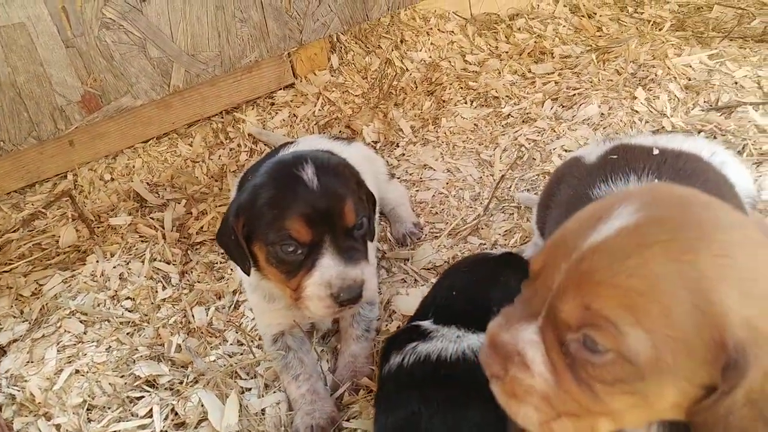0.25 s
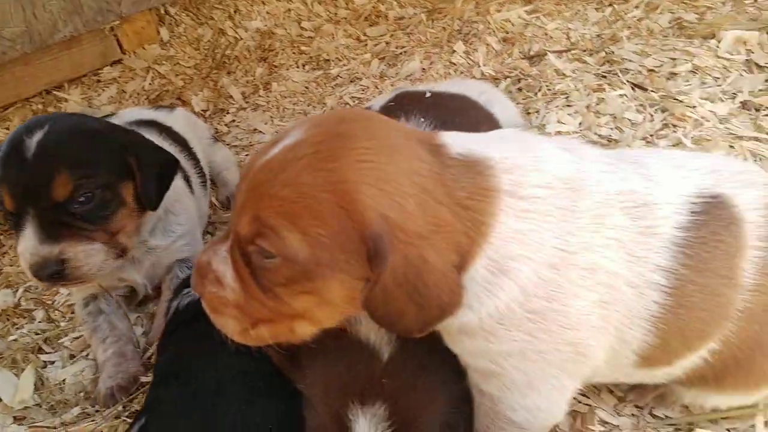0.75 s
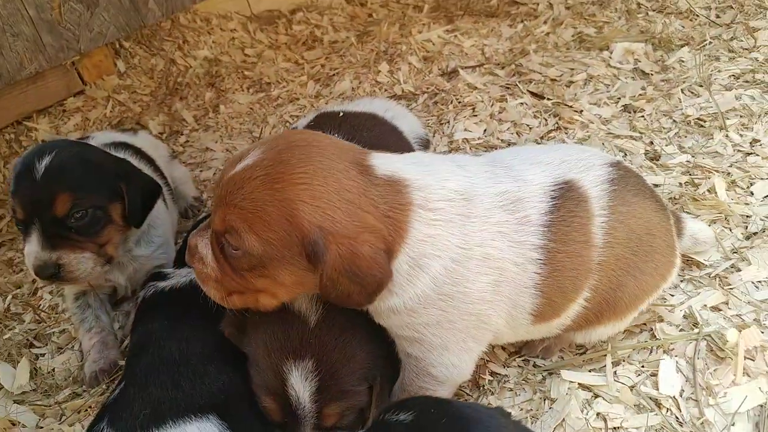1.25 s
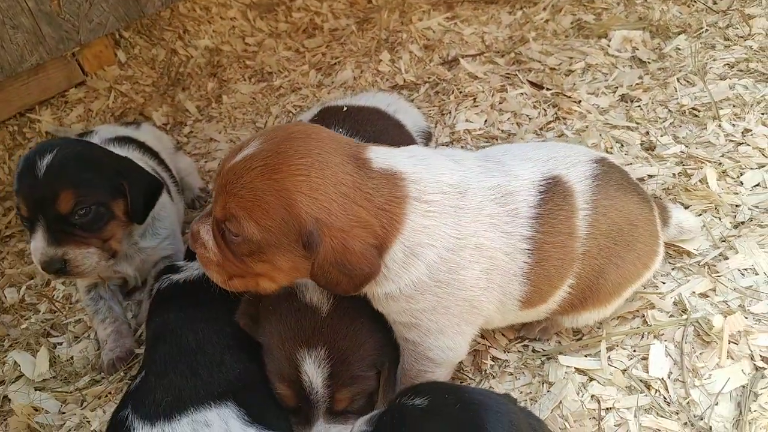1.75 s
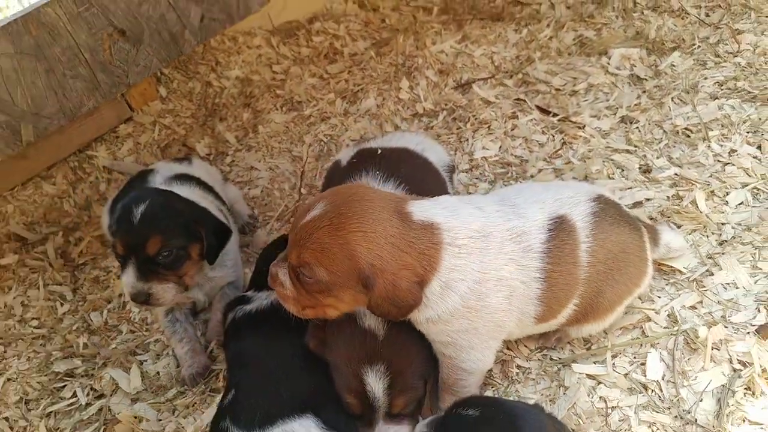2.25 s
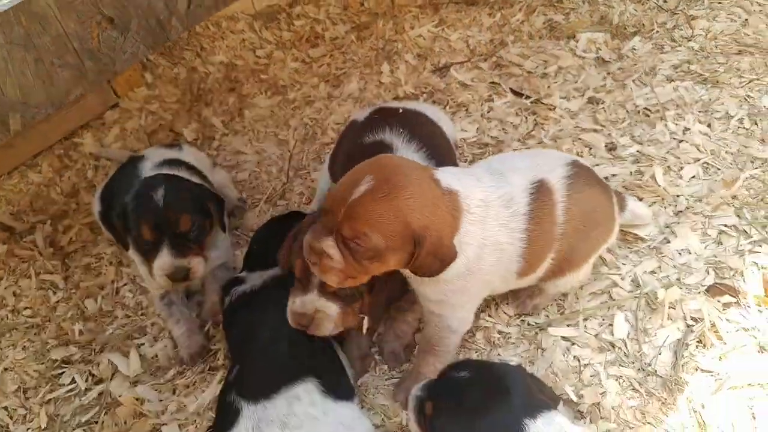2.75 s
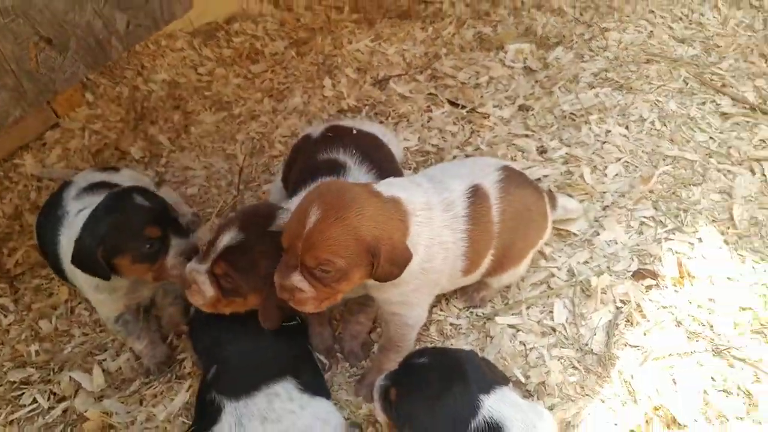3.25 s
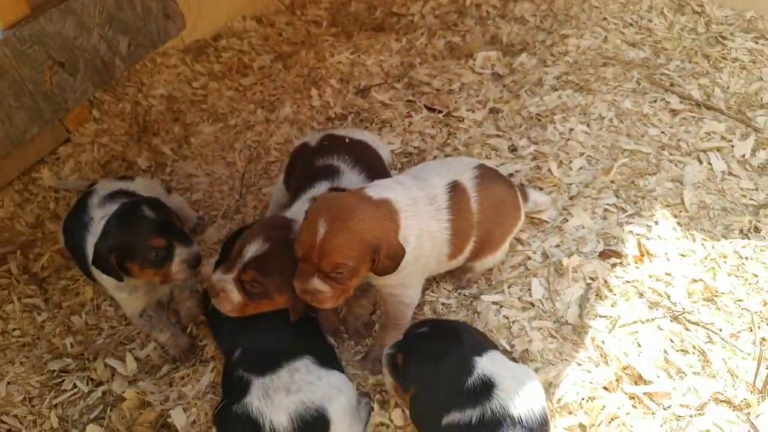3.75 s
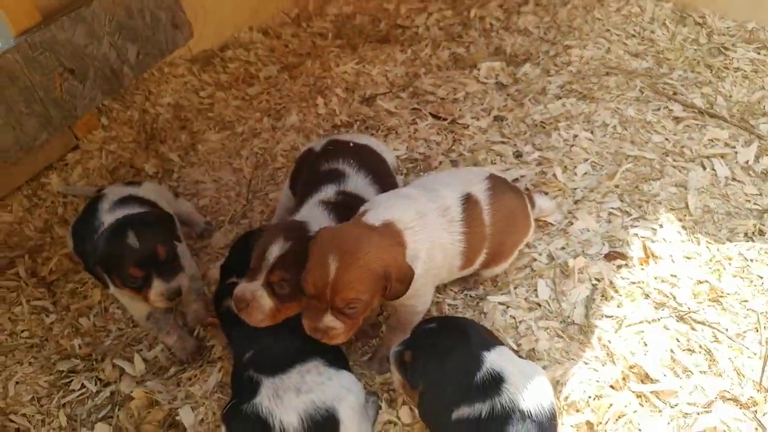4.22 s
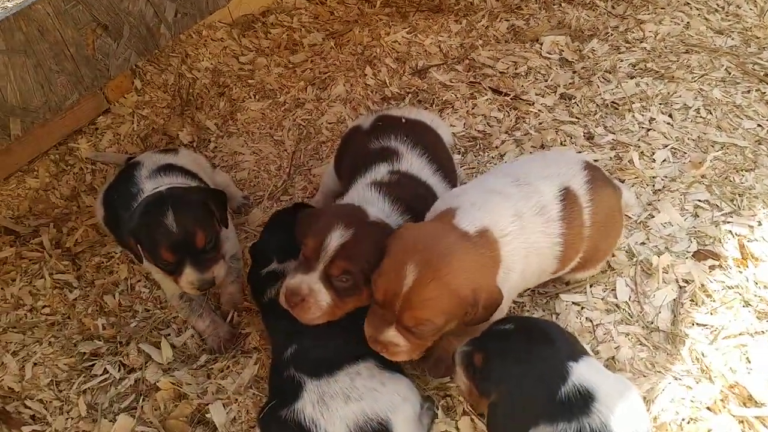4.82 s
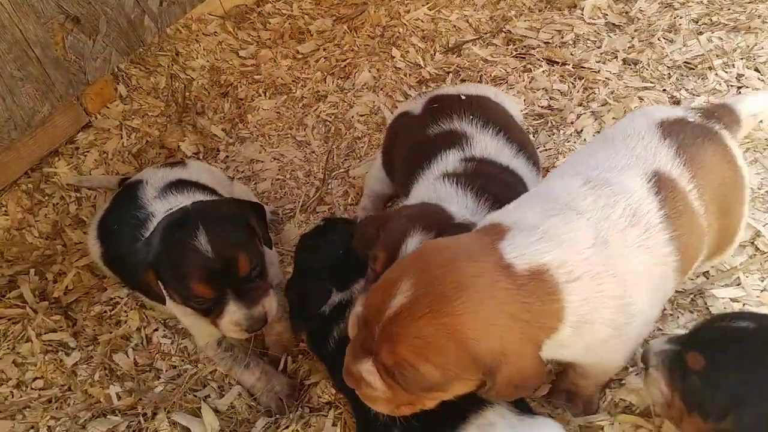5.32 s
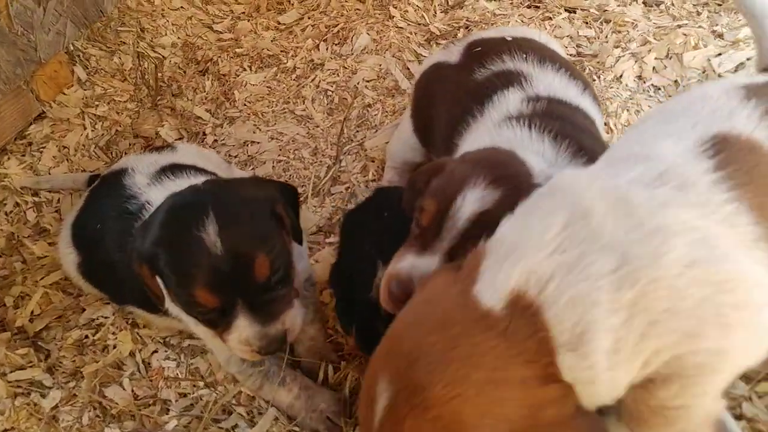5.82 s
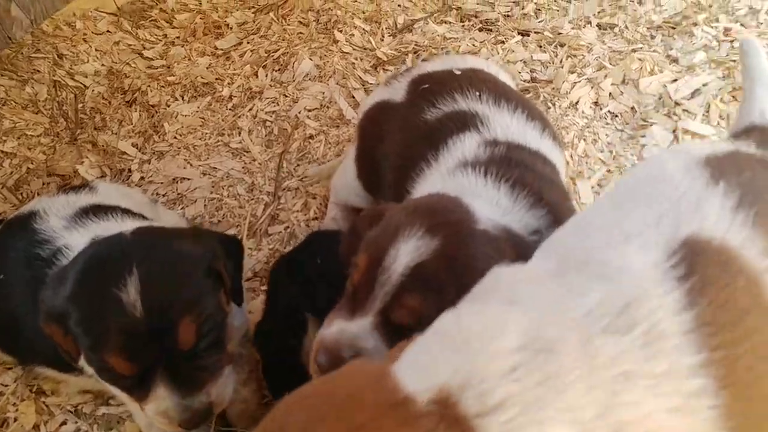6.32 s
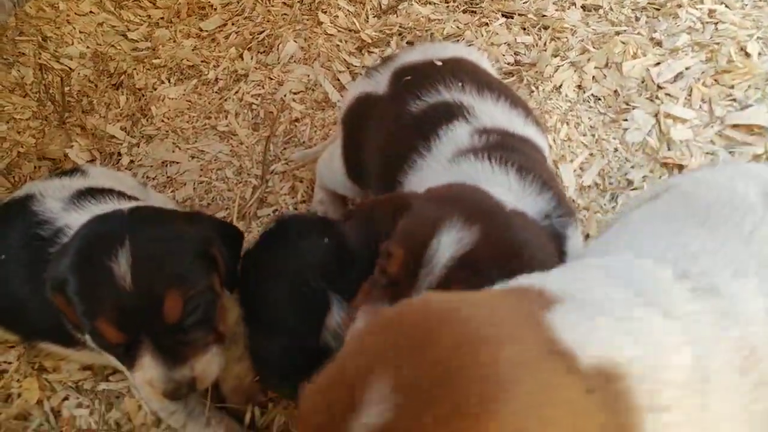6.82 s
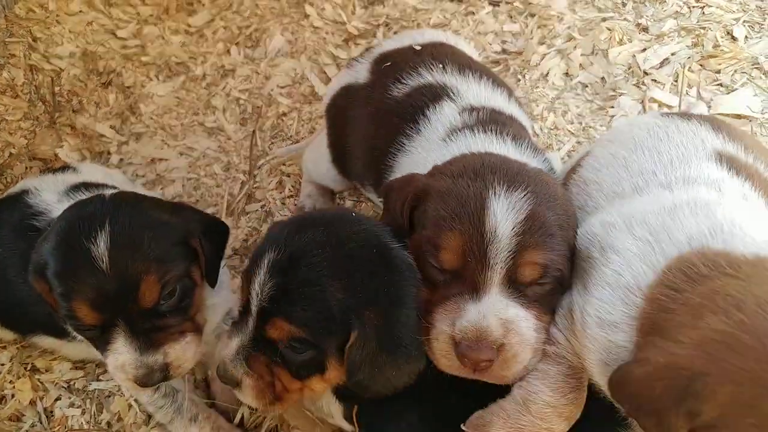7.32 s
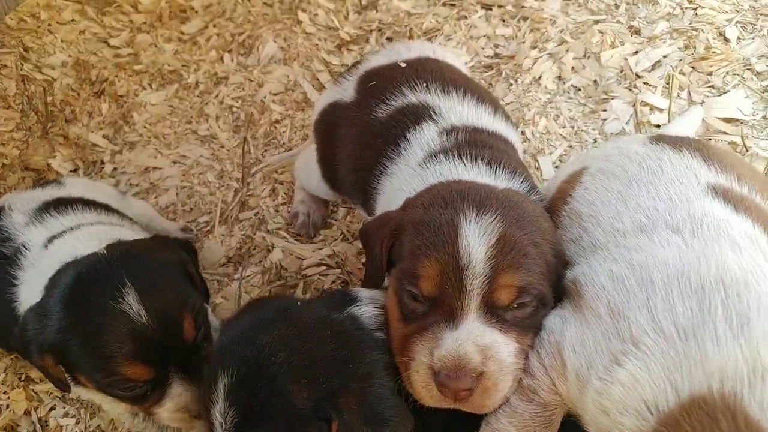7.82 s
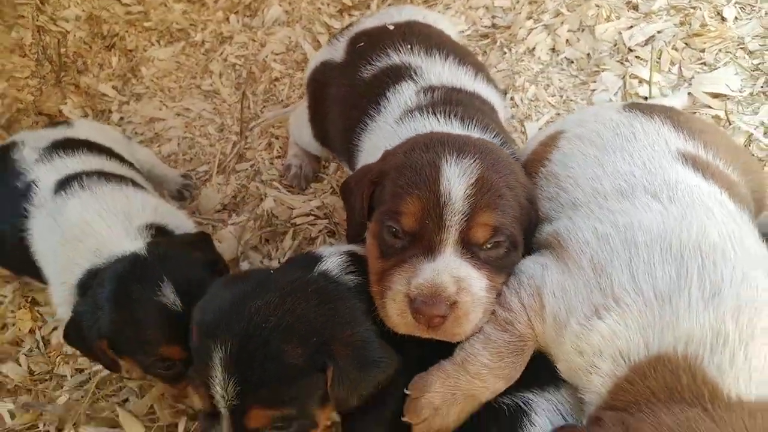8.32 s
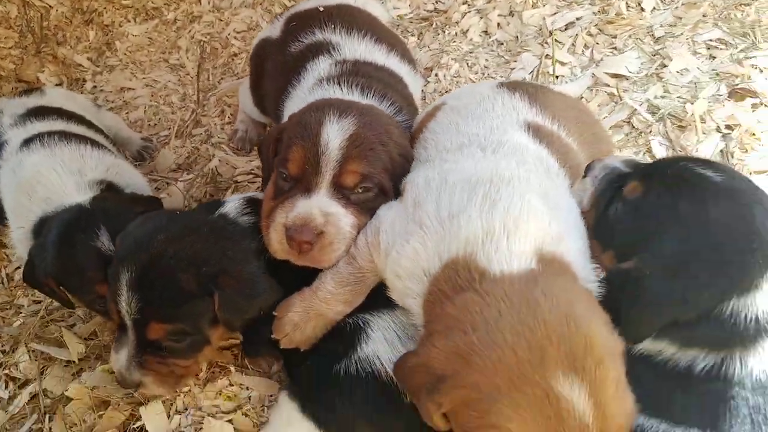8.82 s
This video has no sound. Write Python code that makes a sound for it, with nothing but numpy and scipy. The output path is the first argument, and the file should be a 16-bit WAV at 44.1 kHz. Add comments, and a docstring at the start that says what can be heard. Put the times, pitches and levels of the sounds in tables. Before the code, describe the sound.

Close rubbing and scuffing on the microphone with low handling bumps, then a puppy gives a few whimpers, thin whines and short yips.

```python
"""Rubbing and scuffing right at the microphone, as a hand-held camera moves beside puppies in a wooden
box of shavings outdoors. The rubbing is countless tiny slips, some strokes with a dry snap, and the
handling shakes the camera's shell with rumble, bumps and knocks. Late on a puppy's vocal folds give
two whimpers, three thin whines and three short yips. A faint fuzzy tone sets in near the end."""
import sys
import numpy as np
from scipy import signal
from scipy.fft import rfft, irfft, next_fast_len
from scipy.io import wavfile
from scipy.ndimage import uniform_filter1d, map_coordinates

SR = 44100
rng = np.random.default_rng(int(sys.argv[2]) if len(sys.argv) > 2 else 0)


def unload_wav(signal):
    """Save mono or channel-first audio to the path in sys.argv[1] as 16-bit WAV at rate SR, clipped to [-1, 1]."""
    wavfile.write(
        sys.argv[1],
        SR,
        np.round(np.clip(np.atleast_2d(signal).T, -1, 1) * 32767).astype(np.int16),
    )


N = 399490
TIME = np.arange(N) / SR

# rubbing strokes at the microphone: crest_s, rise_s, fall_s, strength_db, weight_db (heavy is hollower)
STROKES = [(0.035, .037, .064, -30.5, 0), (0.139, .041, 0.037, -51, 5.5), (0.213, 0.056, 0.11, -39, 0.5),
           (0.453, 0.11, 0.14, -38, 3), (0.733, .038, .019, -52.5, 5), (0.795, .048, 0.066, -47, 3),
           (0.97, 0.11, 0.065, -44.5, 0), (1.05, 0.068, 0.099, -22.5, 3.5),
           (1.119, 0.091, 0.047, -18.5, 5.5), (1.24, 0.023, 0.042, -37, 2.5),
           (1.418, .043, 0.011, -34, 3.5), (1.497, 0.041, 0.038, -27, 5.5), (1.593, 0.02, 0.012, -40, 8.5),
           (1.939, 0.038, 0.09, -26.5, 2), (2.107, 0.048, 0.026, -31.5, 3.5),
           (2.17, 0.077, 0.088, -52, 0.5), (2.3, 0.06, 0.035, -29.5, -2.5),
           (2.473, 0.059, 0.097, -47, -0.5), (2.759, 0.086, 0.059, -38, 2),
           (2.874, 0.023, 0.035, -36.5, 2.5), (3.076, 0.087, 0.041, -38.5, 2), (3.175, 0.06, 0.067, -46, 1),
           (3.285, 0.016, 0.032, -43, -2), (3.434, 0.065, 0.053, -26.5, 1.5), (3.53, 0.066, .094, -27, -3),
           (3.71, 0.026, 0.082, -53.5, -3.5), (3.903, .1, 0.12, -37.5, -5.5),
           (4.116, 0.071, 0.057, -37, -5.5), (4.322, 0.054, .03, -23.5, -10), (4.51, 0.037, 0.029, -42, -1),
           (4.6, 0.074, 1, -62, -0.5), (4.721, 0.063, 0.073, -33, -1.5), (5.06, 0.14, 0.22, -52, -3.5),
           (5.145, 0.035, 0.044, -50.5, 0), (5.413, 0.12, 0.079, -23, -3.5), (5.679, 0.047, 0.066, -27, -4),
           (5.884, 0.12, 0.23, -47.5, -2.5), (6.059, 0.038, 0.087, -16.5, 5.5),
           (6.18, 0.025, 0.12, -19.5, 2.5), (6.321, 0.1, 0.0097, -28, -1.5), (6.409, 0.1, .05, -16.5, -0.5),
           (6.484, 0.012, 0.095, -45.5, -3), (6.613, 0.046, 0.073, -22.5, 3.5),
           (6.773, 0.028, 0.0088, -18.5, 6), (6.825, 0.079, 0.094, -15.5, -0.5),
           (7.146, 0.19, 0.2, -54, -2), (7.358, .12, .26, -24.5, -4), (7.522, 0.15, 0.05, -16.5, -4.5),
           (7.773, .14, .3, -61.5, -10.5), (8.433, 0.069, 0.13, -60.5, -7.5), (8.819, 0.086, 1, -63, 2)]
# slow drift of the rubbing's colour: time_s, hollow_hz, treble_db
RUB_COLOUR = [(0, 666, -4), (1.1, 643, -4), (1.5, 558, -5.5), (2.1, 495, -2), (2.6, 523, 2.5),
              (2.85, 456, 2), (3.15, 510, -2), (3.55, 540, -1.5), (4.6, 463, -1.5), (5.45, 643, 0),
              (5.7, 650, 4), (6.05, 640, 1), (6.25, 625, -3.5), (6.65, 474, 3), (7.1, 443, 2.5),
              (7.5, 685, 0), (7.8, 546, 16), (8.85, 555, 1)]
# spectra of a stroke's two hollows, its rasp and its hiss: frequency_hz, density_db
LOW_HOLLOW = [(120, -39), (250, -8), (345, 2), (450, -3), (600, -2), (800, -6.5), (1050, -17.5),
              (1400, -33), (3000, -58)]
HIGH_HOLLOW = [(150, -35.5), (330, -9), (440, -13.5), (505, -5), (560, -2.5), (640, 1), (740, -2.5),
               (860, -7), (1020, -11), (1400, -28), (3000, -58)]
RASP = [(500, -51), (900, -8.5), (1200, -7.5), (2200, -3), (3200, -3), (4600, -2), (5600, -11.5),
        (8000, -49.5)]
HISS = [(3000, -63), (4400, -11.5), (5300, -1), (6500, 2), (7800, 3), (10500, -4), (12000, -12),
        (14000, -16.5), (16000, -26)]
# ring of the wooden walls: frequency_hz, t60_s
BOX_DECAY = [(200, .12), (900, 0.11), (3000, 0.21), (10000, 0.03)]
# tremble of the hand on the camera: time_s, level_db
GRIP = [(0.0, -36.5), (0.91, -42.5), (1.16, -36), (1.43, -36.5), (1.69, -44), (1.89, -50.5), (2.17, -34),
        (3.2, -48.5), (4.31, -43), (5.67, -51.5), (5.83, -37.5), (6.08, -32.5), (6.21, -24.5),
        (6.63, -32.5), (7.06, -24), (7.59, -48), (8.28, -59.5), (9.06, -55.5)]
# spectra of the camera shell's two resonances and of the outdoor air: frequency_hz, density_db
RUMBLE = [(20, -35), (32, -29), (48, -6.5), (62, 1.5), (85, -3), (110, -11), (150, -33), (300, -56.5)]
DRONE = [(80, -41.5), (135, -6.5), (168, 7), (210, -6.5), (260, -16.5), (400, -58.5)]
AIR = [(25, -6.5), (60, 5), (150, 1.5), (300, -6), (650, 0), (1300, -12.5), (4000, -11.5), (8000, -12),
       (10500, -9.5), (13000, -19), (16000, -21)]
# sudden contacts: start_s, rasp_db, hiss_over_rasp_db
SNAPS = [(0.502, -30.5, -7.5), (0.596, -37.5, -13.5), (0.761, -49, -2.5), (1.296, -29, -5.5),
         (1.408, -23, -0.5), (1.453, -24.5, -4), (1.577, -25, -8), (2.156, -29, -1), (2.307, -14, -3.5),
         (2.59, -23, -3), (2.778, -28, -1), (3.094, -20.5, -1.5), (3.178, -38, -1.5), (3.272, -49, 9),
         (3.375, -26, -3.5), (3.792, -28.5, -9), (4.194, -22.5, 1), (4.299, -34, -5), (4.325, -36, 10),
         (4.476, -24.5, -24.5), (5.615, -23, -7), (5.835, -40, -4.5), (6.019, -20.5, 0.5),
         (6.156, -18, -12), (6.239, -16, -9.5), (6.541, -32.5, 0.5), (6.753, -30.5, 4), (7.027, -13, -4)]
# bumps on the camera and short hollow knocks: start_s, relative_level_db, pitch_hz
BUMPS = [(1.138, -24.5, 87.3), (1.412, -26.5, 92.5), (1.516, -26, 90.6), (1.91, -24, 88),
         (2.087, -27.5, 88.5), (2.334, -25.5, 83), (3.181, -30.5, 75), (3.396, -26, 78), (4.203, -30, 72),
         (5.619, -32, 81), (6.032, -14, 75.4), (6.164, -11, 64.7), (6.244, -18.5, 58.5), (6.634, -16, 66.6),
         (6.873, -10, 77.6), (7.032, -4.5, 80), (7.104, -17.5, 66)]
KNOCKS = [(1.232, -27, 635), (1.585, -21.5, 596), (2.59, -23, 644), (3.177, -28, 1015), (4.195, -22, 637),
          (3.688, -26.5, 175), (4.663, -20, 185), (4.664, -27, 468), (6.61, -9, 220), (6.871, -13, 196),
          (7.029, -10, 359)]
# the puppy's calls, one contour per call: time_s, pitch_hz, relative_level_db
WHIMPERS = [
    [(5.875, 1090, -43), (5.889, 1293, -25), (5.902, 1157, -18.5), (5.915, 1040, -29), (5.931, 910, -49.5)],
    [(6.098, 890, -30.5), (6.115, 997, -20.5), (6.132, 975, -25.5), (6.15, 870, -46)],
]
WHINES = [
    [(6.568, 1078, -27), (6.6, 1283, -36), (6.622, 1316, -36), (6.645, 1316, -28.5), (6.675, 1064, -30.5)],
    [(6.885, 1430, -40), (6.91, 1524, -22), (6.93, 1557, -29), (6.96, 1715, -24), (6.985, 1648, -23.5),
     (7.005, 1710, -29), (7.03, 1630, -22.5)],
    [(7.218, 1390, -35), (7.243, 1270, -31), (7.28, 1490, -26.5), (7.322, 1690, -17.5), (7.36, 1520, -29),
     (7.382, 1307, -21), (7.402, 1030, -34)],
]
YIPS = [
    [(7.567, 1173, -40.5), (7.575, 846, -15.5), (7.598, 758, -21), (7.612, 752, -15.5), (7.618, 854, -13.5),
     (7.625, 860, -14.5), (7.633, 895, -21)],
    [(7.83, 1224, -29.5), (7.839, 848, -22), (7.856, 843, -16), (7.871, 840, -17), (7.878, 887, -12.5),
     (7.89, 860, -23)],
    [(8.051, 885, -32.5), (8.058, 760, -27.5), (8.064, 611, -22.5), (8.071, 638, -24), (8.078, 562, -39.5)],
]
# overtone strength through the nose and through the open mouth: frequency_hz, gain_db
NOSE = [(1700, -0.5), (2550, -9), (3400, -21.5), (5000, -21.5), (6600, -13), (8300, -9), (10000, -13.5),
        (11500, -37.5), (15000, -44.5)]
MOUTH = [(850, -0.5), (1650, -8.5), (2450, -14.5), (3400, -41.5), (4300, -44), (5200, -34), (7500, -22),
         (10500, -20.5), (12000, -46.5), (15000, -37)]
# narrow noise bands of the faint tone: centre_hz, level_db
TONE_BANDS = [(168, -54.5), (330, -65), (650, -56.5)]
# likeness of the sound at the two microphone ports: frequency_hz, correlation
PORT_LIKENESS = [(60, 0.98), (200, 0.88), (380, .8), (700, 0.54), (1300, 0.037)]
# bass roll-off and treble notch of both ports: frequency_hz, gain_db
PORT_COLOUR = [(20, -31), (32, -21), (42, -12.5), (50, 2.5), (62, 0.5), (8100, -1), (8600, -8.5),
               (9000, -10.5), (9500, -5.5), (10100, -4.5), (11000, -3)]
# imbalance of the ports: frequency_hz, left_minus_right_db
PORT_BALANCE = [(60, 2), (800, 3), (1800, 0.5), (4200, -.5), (7500, -2), (8800, -3.5), (10200, 21.5),
                (15000, 7.5)]

TOP_HZ = 16100  # upper limit of the sound


def amp(db):
    """Decibels to gain."""
    return 10 ** (np.asarray(db) / 20)


def unit(x):
    """Scale to rms 1."""
    return x / np.sqrt(np.mean(x ** 2) + 1e-20)


def along(points, hz):
    """Read (frequency_hz, value) points on a log frequency axis."""
    frequencies, values = np.transpose(points)
    return np.interp(np.log(hz + 1), np.log(frequencies + 1), values)


def curves(rows):
    """One value per sample for each column after the time."""
    times, *columns = np.transpose(rows)
    return [np.interp(TIME, times, column) for column in columns]


def wobble(rate, size=N):
    """A smooth random curve, rate knots a second."""
    knots = rng.standard_normal(int(size * rate / SR) + 4)
    return map_coordinates(knots, [np.arange(size) * rate / SR])


def filtered(x, response):
    """Filter x by a response given as a function of frequency."""
    size = next_fast_len(N + 8192)
    return irfft(rfft(x, size) * response(np.fft.rfftfreq(size, 1 / SR)), size)[..., :N]


def coloured(pair, spectrum):
    """Shape two unrelated signals into left and right, rms 1: alike in the bass, apart in the treble."""
    def response(hz):
        turn = np.arccos(np.clip(along(PORT_LIKENESS, hz), -1, 1)) / 2
        return amp(along(spectrum, hz)) * np.array([np.cos(turn), np.sin(turn)])
    mid, side = filtered(pair, response)
    return unit(np.array([mid + side, mid - side]))


def stroke_force(edge_db, bite, release):
    """Force and weight of the rubbing: strokes bite, crest and let go; each snap slides on briefly."""
    power, weighted = np.zeros((2, N))
    slide_rise_s, slide_fall_s = 0.0054, 0.074
    slides = [(start_s + slide_rise_s, slide_rise_s, slide_fall_s, db - 22.5, 0)
              for start_s, db, _ in SNAPS]
    for crest_s, rise_s, fall_s, db, weight_db in STROKES + slides:
        near = slice(*np.searchsorted(TIME, [crest_s - 2 * rise_s, crest_s + 2 * fall_s]))
        t = TIME[near] - crest_s
        off_crest = np.where(t < 0, np.abs(t / rise_s) ** bite, np.abs(t / fall_s) ** release)
        stroke = amp(db - edge_db * off_crest) ** 2
        power[near] += stroke
        weighted[near] += stroke * amp(weight_db)
    return np.sqrt(power), weighted / (power + 1e-15)


def friction(slips_per_s, spread_db, smooth_db, patchy_db):
    """Countless tiny slips of uneven size; their resonances drift as the contact moves."""
    slips = rng.random(N) < slips_per_s / SR
    sizes = amp(spread_db * np.minimum(rng.standard_normal(N), 2))
    grains = unit(slips * sizes * rng.standard_normal((2, N)))
    spectra = signal.stft(grains + amp(smooth_db) * rng.standard_normal((2, N)), nperseg=512)[2]
    patches = uniform_filter1d(rng.standard_normal(spectra.shape), size=3, axis=1)  # across frequency
    patches = uniform_filter1d(patches, size=12, axis=2)  # across time
    return signal.istft(spectra * amp(patchy_db * np.minimum(unit(patches), 2)), nperseg=512)[1][:, :N]


def rubbing(force, drag):
    """Gritty friction right at the microphone as the camera moves, catching and sliding unevenly."""
    hollow_hz, treble_db = curves(RUB_COLOUR)
    catching = amp(0.7 * wobble(70) + 1.2 * wobble(350))
    body, rasp, hiss = np.array([drag, force, force * amp(treble_db)]) * catching
    coarse = friction(slips_per_s=1400, spread_db=2, smooth_db=0.5, patchy_db=2.5)
    high_share = np.clip((hollow_hz - 430) / 170, 0, 1)  # the moving contact shifts between two hollows
    hollow = np.sqrt(1 - high_share) * coloured(coarse[:, ::-1], LOW_HOLLOW)
    hollow += np.sqrt(high_share) * coloured(coarse, HIGH_HOLLOW)
    gritty = coloured(friction(slips_per_s=2200, spread_db=2, smooth_db=0.5, patchy_db=4.5), RASP)
    fine = coloured(friction(slips_per_s=6900, spread_db=4.5, smooth_db=-1.5, patchy_db=4), HISS)
    return body * hollow + amp(0.76) * rasp * gritty + amp(-0.68) * hiss * fine


def box(x):
    """The short answer of the nearby wooden walls, different at each microphone port."""
    hz, t, spectra = signal.stft(rng.standard_normal((2, SR // 4)), SR, nperseg=256)
    decay = amp(-60 * t / along(BOX_DECAY, hz)[:, None])
    tail = signal.istft(spectra * decay, SR, nperseg=256)[1]
    return signal.fftconvolve(x[None], tail / np.linalg.norm(tail[0]), axes=1)[:, :N]


def handling(drag, weight, tremble_db, linger_s):
    """The trembling grip and the drag of heavy strokes shake two low resonances of the camera's shell."""
    grip = amp(curves(GRIP)[0] + tremble_db * wobble(14))
    pole = np.exp(-1 / (linger_s * SR))
    lingering = signal.lfilter([1 - pole], [1, -pole], drag)
    rumble = np.hypot(grip, amp(-6) * lingering) * coloured(rng.standard_normal((2, N)), RUMBLE)
    hollow_hz = curves(RUB_COLOUR)[0]
    depth = weight * (512 / hollow_hz) ** 1.6  # a lower hollow drives the drone harder
    drone_level = np.hypot(amp(-13) * grip, amp(-9.5) * drag * depth)
    return rumble + drone_level * coloured(rng.standard_normal((2, N)), DRONE)


def air():
    """Quiet outdoor air around the box, its level wavering."""
    return amp(-59 + 4.3 * wobble(6.2)) * coloured(rng.standard_normal((2, N)), AIR)


def snaps(hold_s, crack_t60_s, ring_t60_s):
    """A contact lands or breaks free: a dry crack with its own mix of hollow, rasp and hiss."""
    power = np.zeros((3, N))
    t = np.arange(SR // 8) / SR
    crack = amp(-60 * np.maximum(t - hold_s, 0) / crack_t60_s)
    ring = amp(-60 * t / ring_t60_s)
    for start_s, rasp_db, hiss_over_rasp_db in SNAPS:
        hollow_db = -24.5 + 0.52 * rasp_db
        gains = amp([[hollow_db], [rasp_db], [rasp_db + hiss_over_rasp_db]])
        power[:, round(start_s * SR):][:, :len(t)] += gains ** 2 * (crack ** 2 + ring ** 2)
    crackle = friction(slips_per_s=15000, spread_db=1, smooth_db=1.5, patchy_db=3)
    bands = zip(np.sqrt(power), [HIGH_HOLLOW, RASP, HISS])
    return sum(level * coloured(crackle, spectrum) for level, spectrum in bands)


def bumps(sag, swell_s):
    """A bump rocks the camera for a few cycles, sinking in pitch."""
    out = np.zeros(N)
    t = np.arange(SR // 5) / SR
    swell = (t / swell_s) ** 2 * np.exp(2 - 2 * t / swell_s)
    for start_s, db, hz in BUMPS:
        rocking = np.sin(2 * np.pi * hz * (t - sag * t ** 2))
        out[round(start_s * SR):][:len(t)] += amp(db) * swell * rocking
    return out


def knocks(t60_s, attack_s, sag):
    """A soft, hollow handling knock rings briefly and drops in pitch."""
    out = np.zeros(N)
    t = np.arange(SR // 10) / SR
    for start_s, db, hz in KNOCKS:
        ring = np.sin(2 * np.pi * hz * (t - sag * t ** 2)) * amp(db - 60 * t / t60_s)
        out[round(start_s * SR):][:len(t)] += ring * (1 - np.exp(-t / attack_s))
    return out


def voice(calls, overtones, harmonics, jitter, shimmer_db, flutter_db, full_db, brightening):
    """Small vocal folds: harmonics on an unsteady pitch, shaped by the throat, brighter with effort."""
    out = np.zeros(N)
    number = np.arange(1, harmonics + 1)[:, None]
    upper_share = np.minimum((number - 1) / 4, 1)  # effort and flutter spare the fundamental
    for call in calls:
        times, hz, db = np.transpose(call)
        start, stop = np.searchsorted(TIME, [times[0], times[-1]])
        t = TIME[start:stop]
        glide_hz = uniform_filter1d(np.interp(t, times, hz), size=200)
        pitch_hz = glide_hz * (1 + jitter * wobble(900, size=len(t)))
        phase = 2 * np.pi * np.cumsum(pitch_hz) / SR
        flutter = flutter_db * np.array([wobble(120, size=len(t)) for _ in number])
        effort_db = brightening * (db.max() - full_db)
        harmonic_hz = number * pitch_hz
        strength = amp(along(overtones, harmonic_hz) + upper_share * (effort_db + flutter))
        tone = (strength * (harmonic_hz < TOP_HZ) * np.sin(number * phase)).sum(0)
        level = amp(np.interp(t, times, db) + shimmer_db * wobble(150, size=len(t)))
        out[start:stop] += np.sqrt(2) * level * tone * signal.windows.tukey(len(t), 0.08)
    return out


def puppy(left_lag_s):
    """Close up in the box: soft whimpers, piercing nasal whines, then rough yips from the right."""
    whimpers = voice(WHIMPERS, NOSE, harmonics=9, jitter=0.015, shimmer_db=5.5,
                     flutter_db=0.5, full_db=-6.5, brightening=0.84)
    whines = voice(WHINES, NOSE, harmonics=10, jitter=0.011, shimmer_db=2,
                   flutter_db=3.5, full_db=-29.5, brightening=0.3)
    yips = voice(YIPS, MOUTH, harmonics=18, jitter=0.0042, shimmer_db=0.6,
                 flutter_db=7, full_db=-7, brightening=1)
    panned = amp(-0.5) * (whimpers + whines) + amp([[-3], [1.5]]) * yips
    direct = filtered(panned, lambda hz: np.exp(1j * np.pi * hz * left_lag_s * np.array([[-1], [1]])))
    return direct + amp(-20) * box(whimpers + whines + yips)


def faint_tone(start_s, attack_s, half_width_hz):
    """A faint, fuzzy tone of narrow noise bands sets in and holds."""
    def bands(hz):
        return sum(amp(db) / (1 + ((hz - centre_hz) / half_width_hz) ** 2)
                   for centre_hz, db in TONE_BANDS)
    level = np.linalg.norm([amp(db) for _, db in TONE_BANDS])
    onset = np.clip((TIME - start_s) / attack_s, 0, 1)
    return level * onset * unit(filtered(rng.standard_normal(N), bands))


def scene():
    """Everything in and around the box, from very close; its walls soften the ends of the strokes."""
    force, weight = stroke_force(edge_db=25.5, bite=2.66, release=2.14)
    # a light touch mostly sounds the hollow; past the knee, extra force goes mainly into rasp
    knee_db, saturation = -45, 0.61
    drag = amp(7) * weight * force / np.hypot(1, force / amp(knee_db)) ** saturation
    scuffs = rubbing(force, drag) + amp(-2) * snaps(hold_s=0.0021, crack_t60_s=0.046, ring_t60_s=0.075)
    mix = scuffs + amp(-18) * box(scuffs.mean(0))
    mix += handling(drag, weight, tremble_db=3, linger_s=0.02)
    mix += amp(4) * bumps(sag=0.81, swell_s=0.015)
    mix += amp(4) * knocks(t60_s=0.068, attack_s=0.0041, sag=1.9)
    mix += puppy(left_lag_s=0.00018)
    mix += faint_tone(start_s=8.76, attack_s=0.015, half_width_hz=23)
    return mix + air()


def record(dry):
    """The microphone ports thin the deep bass and notch the treble, the right duller; peaks round off."""
    def ports(hz):
        return amp(along(PORT_COLOUR, hz) + along(PORT_BALANCE, hz) * np.array([[0.5], [-0.5]]))
    picked_up = filtered(dry, ports)
    rounded = picked_up / (1 + np.abs(picked_up / 0.92) ** 6) ** (1 / 6)
    return filtered(rounded, lambda hz: hz < TOP_HZ)


dry = scene()
out = record(dry)
unload_wav(out)
```